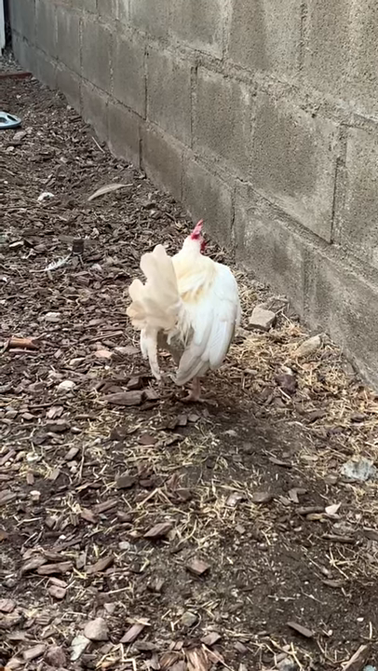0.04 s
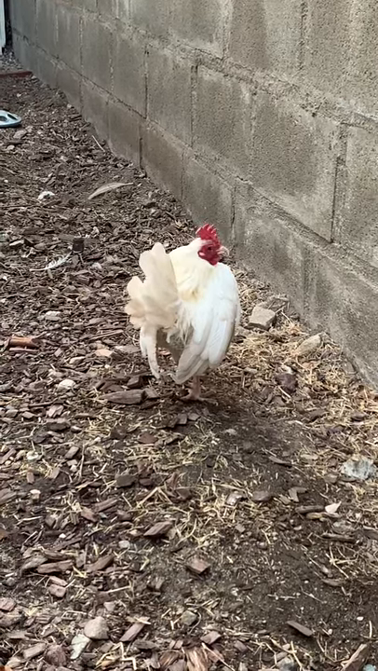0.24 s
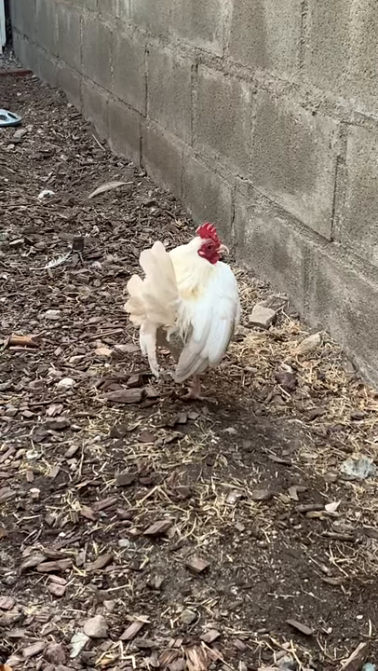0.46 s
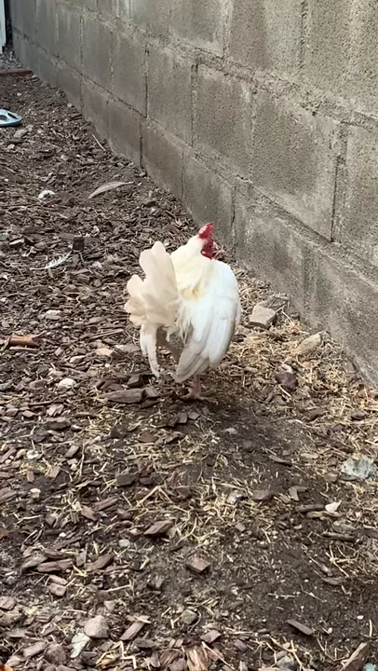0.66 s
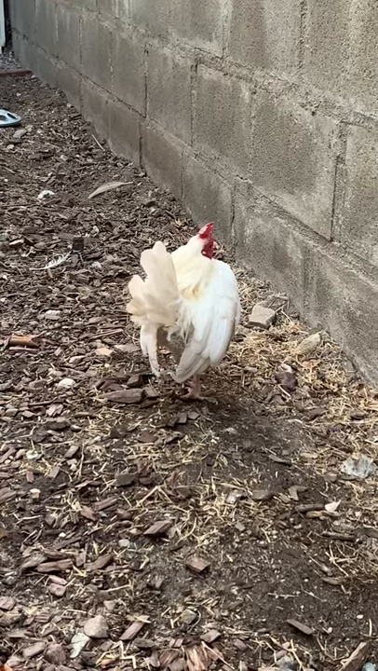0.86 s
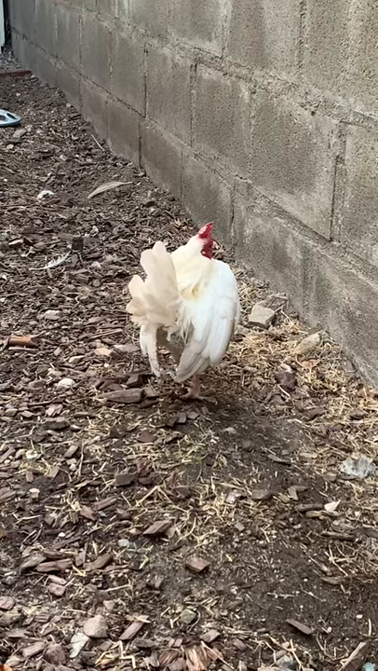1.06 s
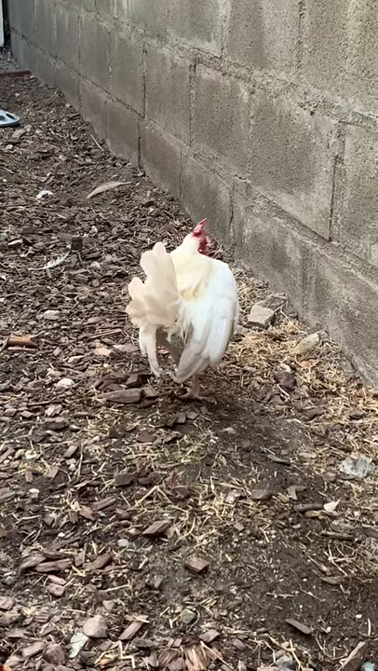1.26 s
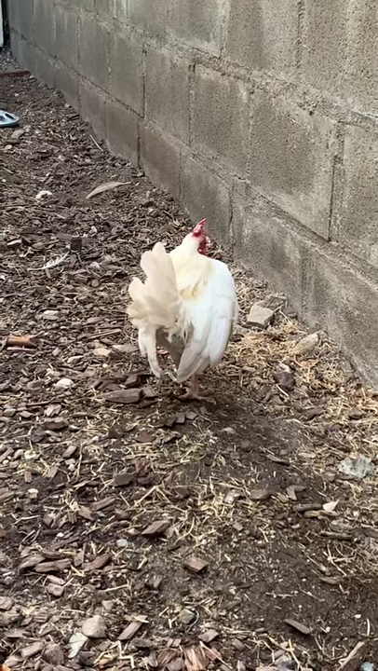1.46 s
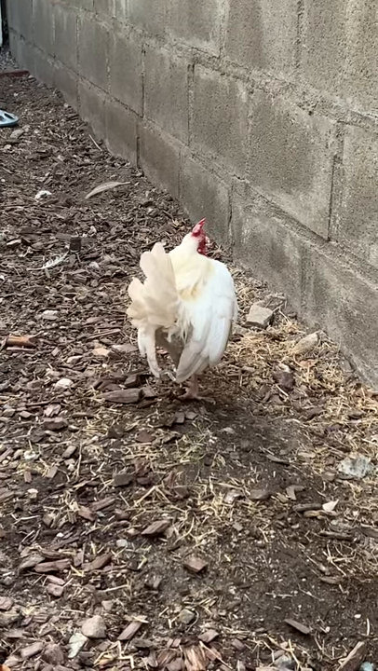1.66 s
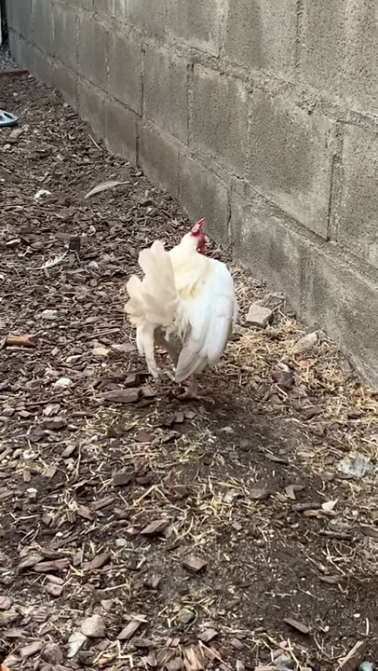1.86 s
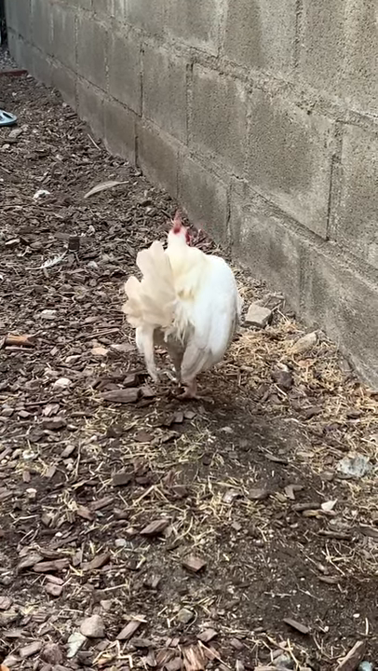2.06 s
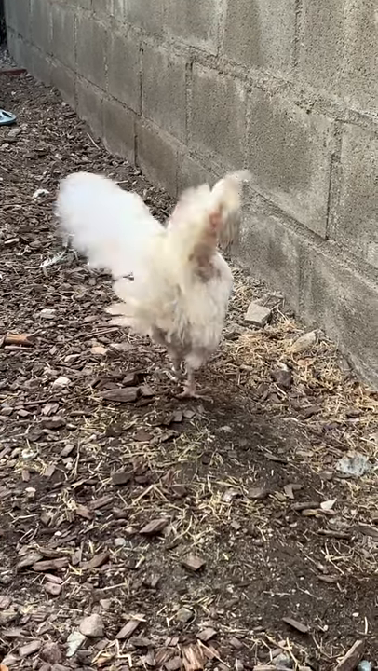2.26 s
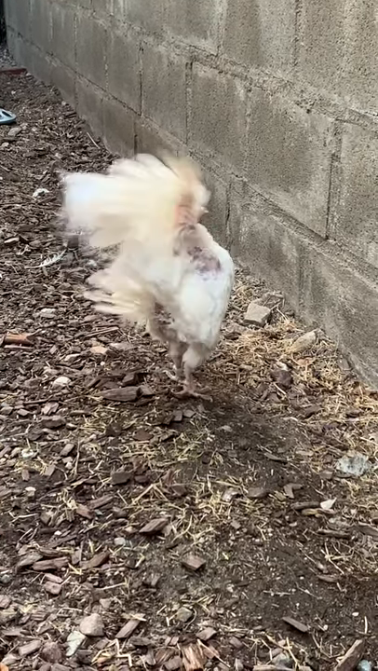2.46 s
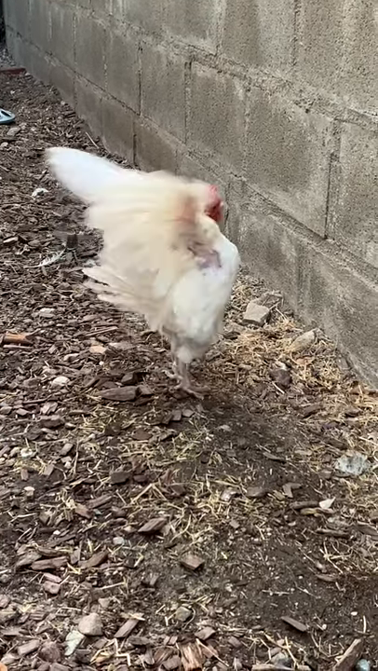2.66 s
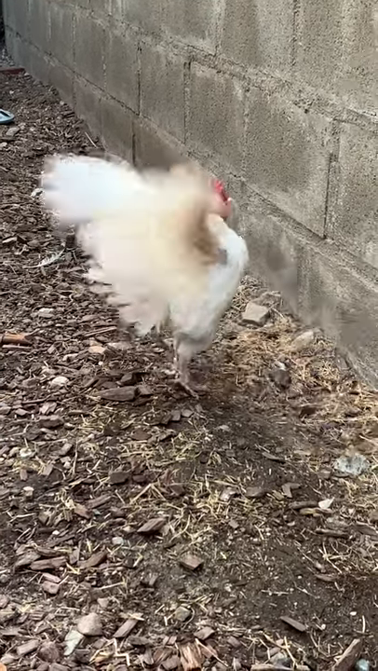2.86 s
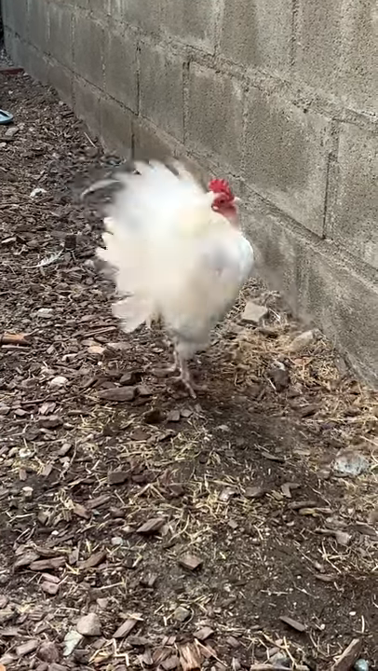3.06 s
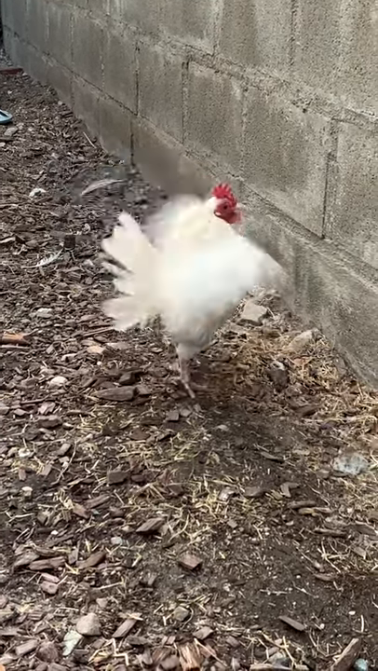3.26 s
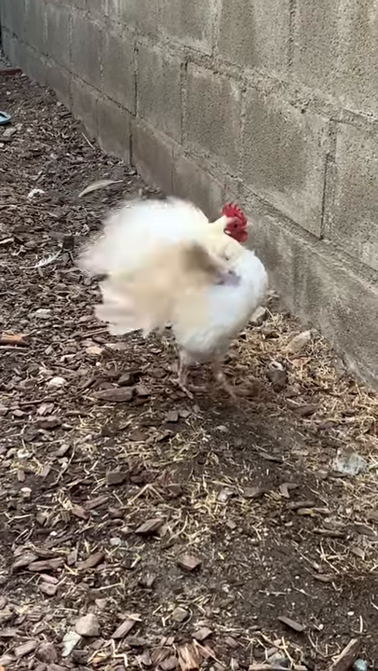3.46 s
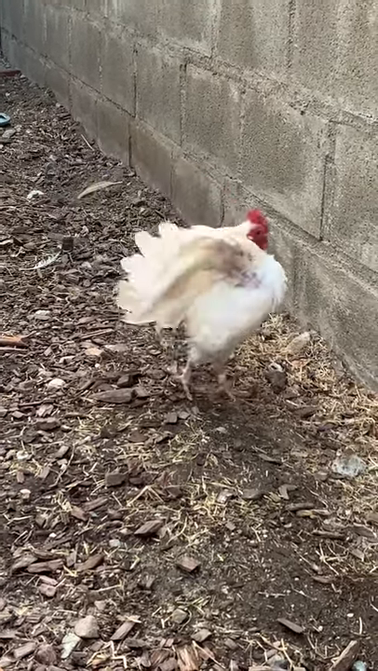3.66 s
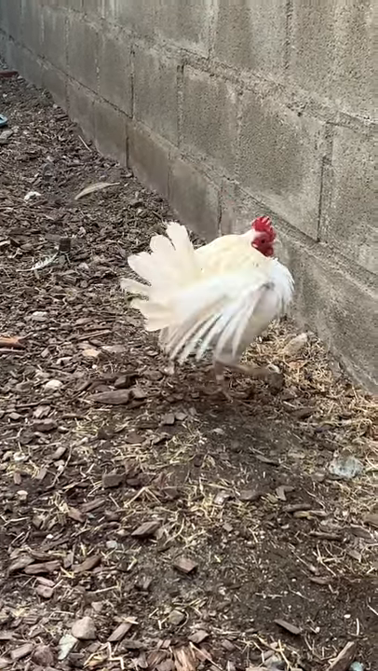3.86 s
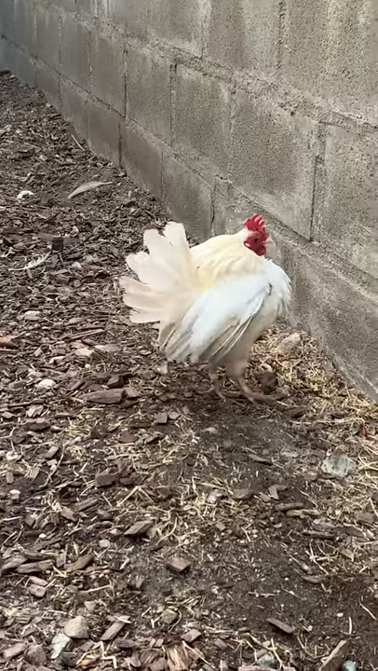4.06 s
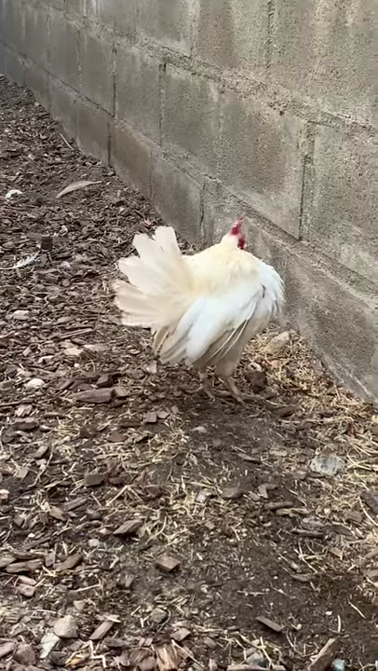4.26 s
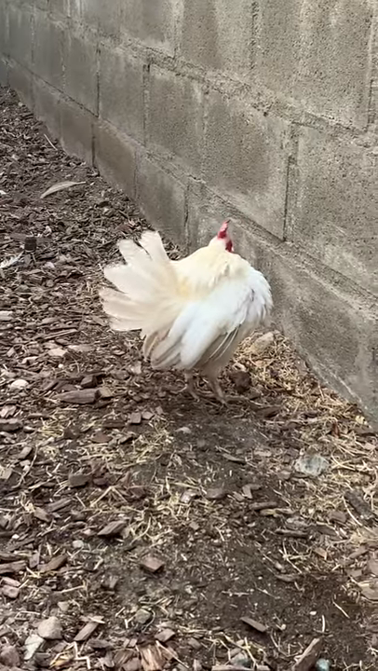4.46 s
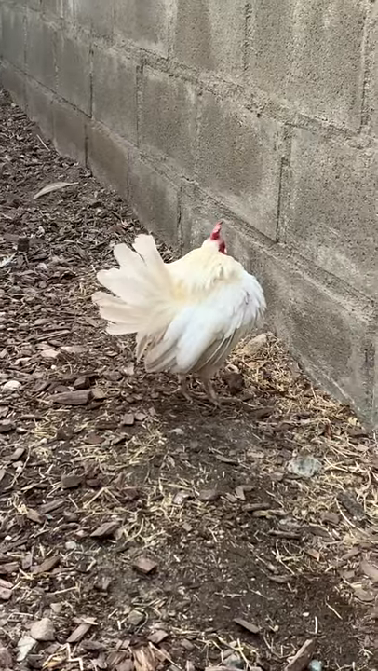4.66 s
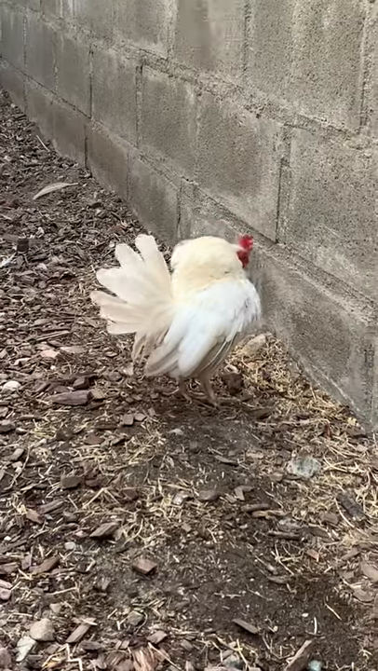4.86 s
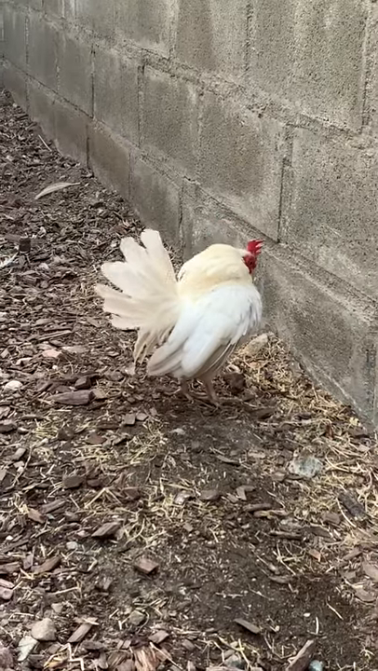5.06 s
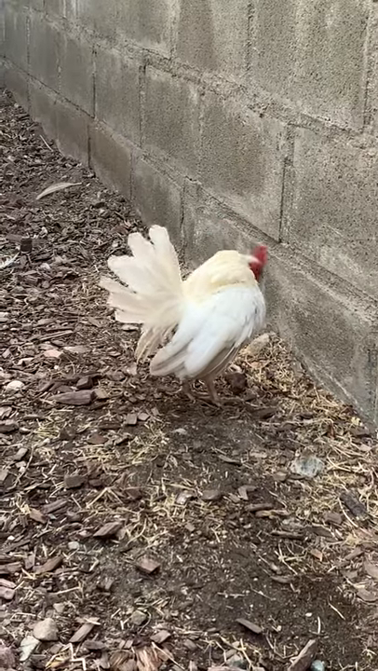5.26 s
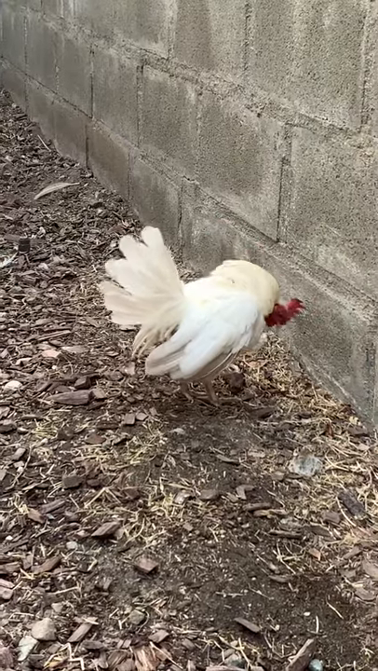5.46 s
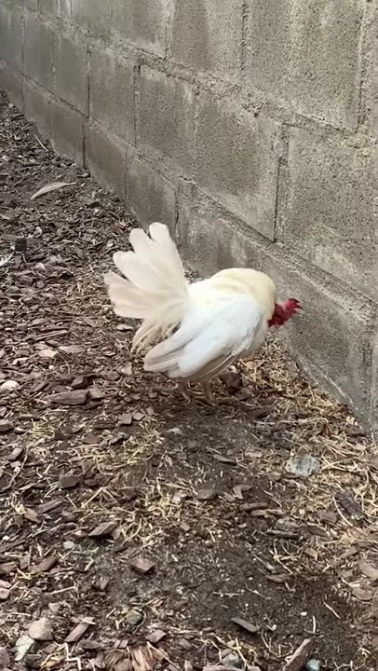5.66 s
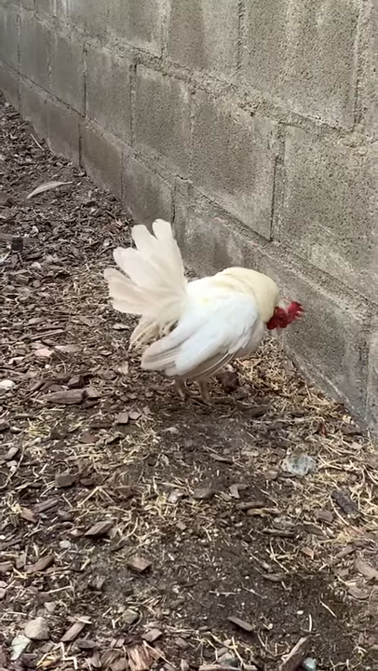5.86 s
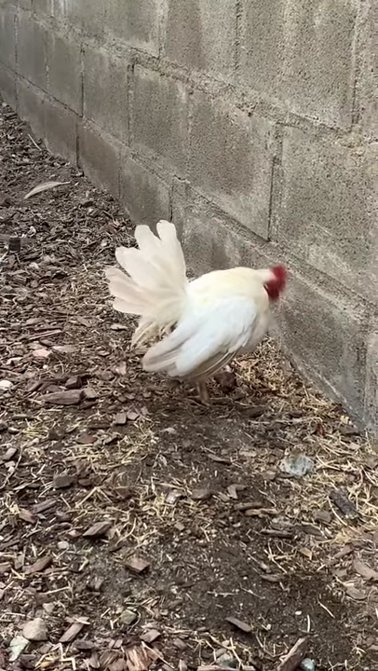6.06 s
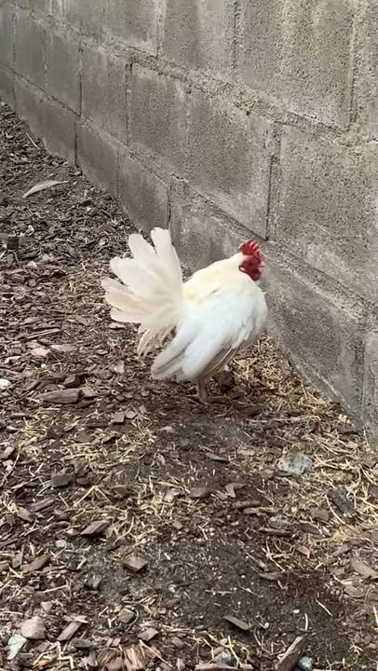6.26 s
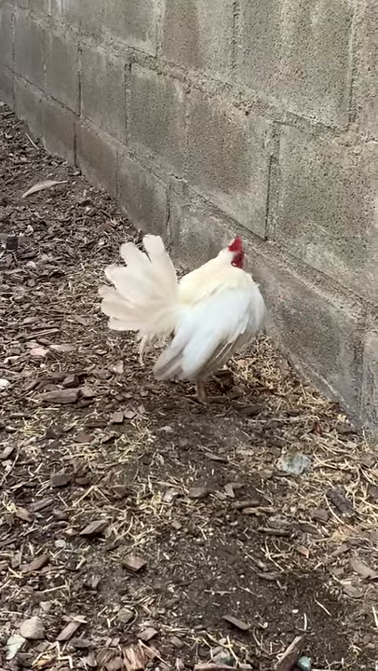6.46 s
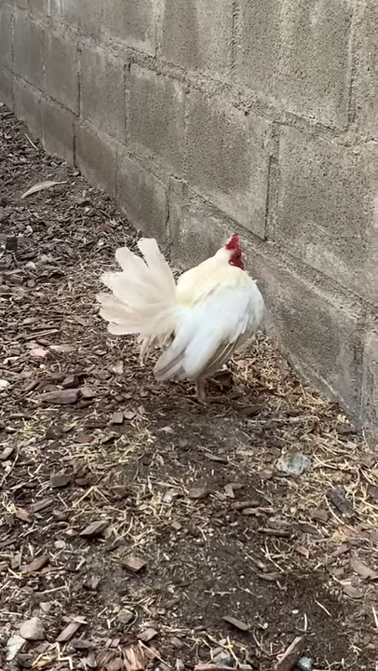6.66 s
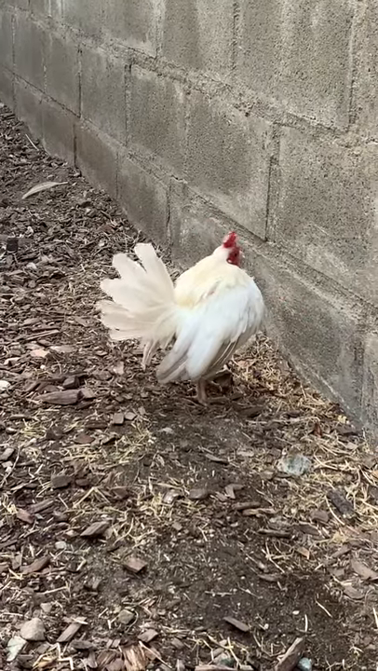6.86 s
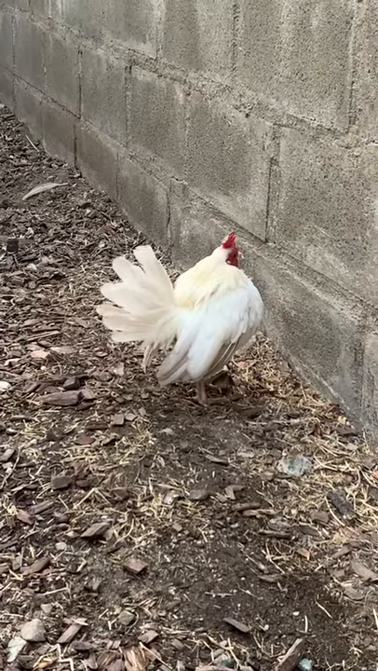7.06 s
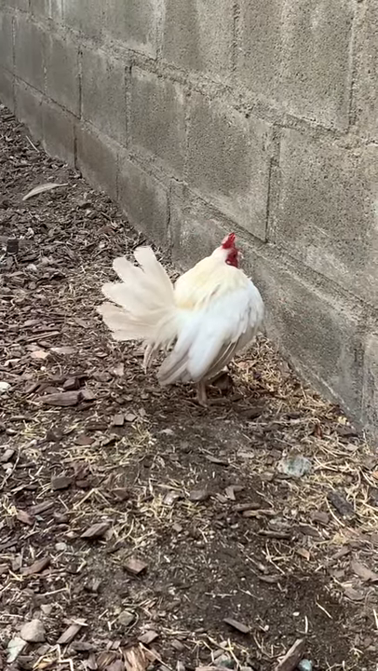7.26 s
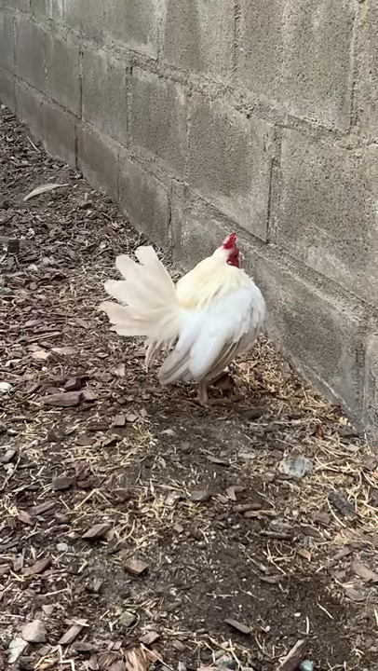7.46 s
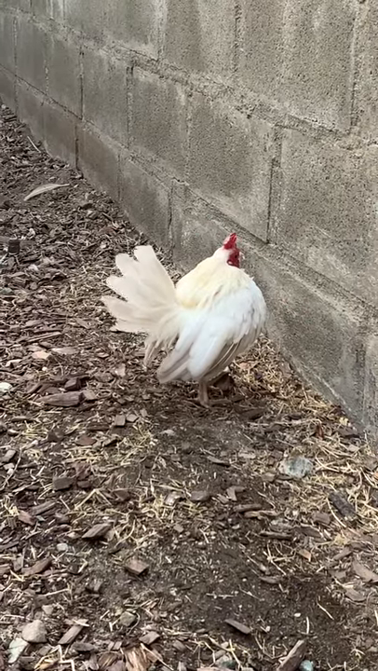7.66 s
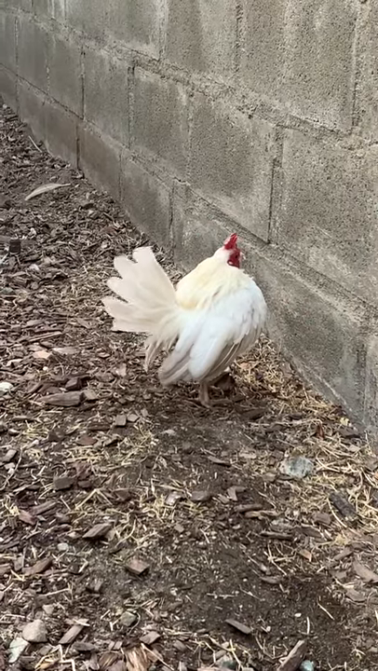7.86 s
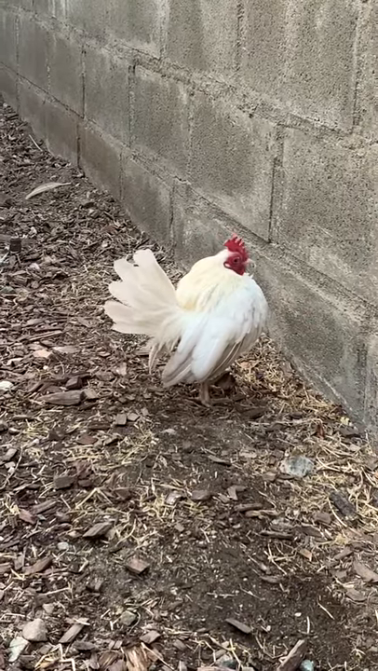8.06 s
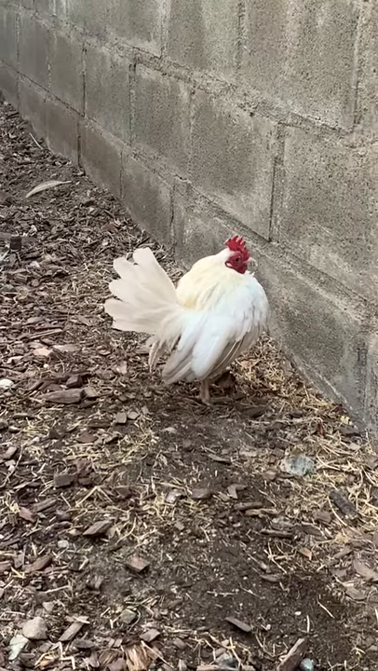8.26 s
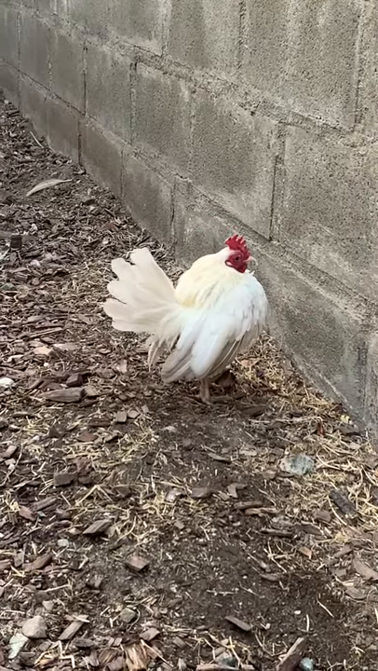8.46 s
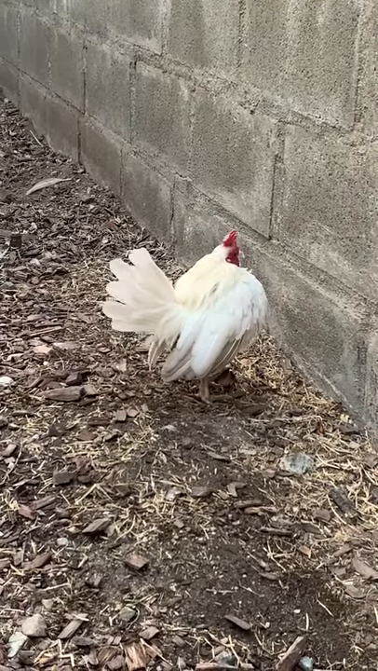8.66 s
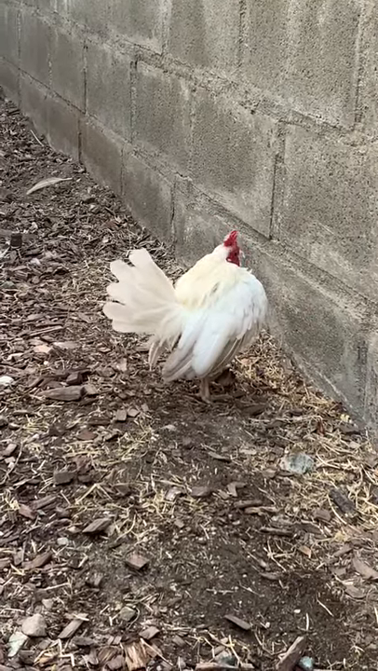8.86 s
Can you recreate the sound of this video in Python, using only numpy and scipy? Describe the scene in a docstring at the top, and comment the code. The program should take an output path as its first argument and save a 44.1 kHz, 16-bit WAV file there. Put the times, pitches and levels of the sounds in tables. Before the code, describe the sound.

A quiet outdoor yard beside a block wall, low town rumble and sparse sparrow chirps. About two and a half seconds in, a rooster beats its wings five times, sharp cracks and hollow slaps with feathery swishes, loudest at the fourth. Rustles settle, then three quick clucks and more chirps. Close stereo microphone, short dry reflections.

```python
"""Wing-clapping rooster in a walled yard

A bantam rooster by a block wall beats its wings: shaped noise swishes through the feathers, and each
clap is a bright crack plus a slap ringing the cupped air. Later it clucks three times, in beating sines.
Small birds chirp as gliding sines nearby and far off, over a town of filtered noise and engine tones;
two microphone ports hear the yard with a phase turn between them."""
import sys
import numpy as np
from scipy import signal
from scipy.fft import rfft, irfft, next_fast_len
from scipy.io import wavfile
from scipy.ndimage import uniform_filter1d, map_coordinates

SR = 44100
rng = np.random.default_rng(int(sys.argv[2]) if len(sys.argv) > 2 else 0)


def wav_record(signal):
    """Record a signal, one row per channel, as 16-bit PCM in the file named by sys.argv[1]."""
    frames = np.transpose(np.atleast_2d(signal))
    bounded = np.clip(frames, -1, 1)
    # unit amplitude maps onto the largest positive 16-bit level
    quanta = np.round(bounded * 32767).astype(np.int16)
    wavfile.write(sys.argv[1], SR, quanta)


N = 392931
TIME = np.arange(N) / SR


def amp(db):
    """Decibel law: 20 dB is a factor of ten in amplitude."""
    return 10 ** (np.asarray(db) / 20)


def unit(x):
    """Normalisation to an rms of 1."""
    return x / np.sqrt(np.mean(x ** 2) + 1e-20)


def along(points, hz):
    """Interpolation of (f/Hz, value) points on a logarithmic frequency axis; the ends hold."""
    f, v = np.transpose(points)
    return np.interp(np.log(hz + 1), np.log(f + 1), v)


def wobble(rate, count=N):
    """Band-limited random modulation: a smooth curve through `rate` random knots a second."""
    knots = rng.standard_normal(int(count * rate / SR) + 4)
    return map_coordinates(knots, [np.arange(count) * rate / SR])


def filtered(x, response):
    """Linear filtering: the spectrum of x times a complex frequency response."""
    m = next_fast_len(x.shape[-1] + 8192)
    return irfft(rfft(x, m) * response(np.fft.rfftfreq(m, 1 / SR)), m)[..., :x.shape[-1]]


def shade(spectrum):
    """Spectral shaping: a gain curve that closes within an octave beyond its ends."""
    closed = [(spectrum[0][0] / 2, -80), *spectrum, (spectrum[-1][0] * 2, -80)]
    return lambda hz: amp(along(closed, hz))


def resonances(modes):
    """Modal superposition: causal response of (f/Hz, width/Hz, level/dB) modes of alternating sign."""
    def response(f):
        return sum((-1) ** k * amp(db) * 1j * f * width / (centre ** 2 - f * f + 1j * f * width)
                   for k, (centre, width, db) in enumerate(modes))
    return response


def swells(s, db, rise, fall):
    """Power addition of overlapping swells, each rising and fading at a steady dB/s."""
    s, db, rise, fall = (np.reshape(v, (-1, 1)) for v in (s, db, rise, fall))
    t = TIME[::SR // 1000]  # a grid of about 1 ms is fine enough
    level_db = db - np.maximum(rise * (s - t), fall * (t - s))
    return np.interp(TIME, t, np.sqrt(np.sum(amp(2 * level_db), axis=0)))


def add(out, s, hz, db, depth, beat_hz, second_db, blur):
    """Frequency and amplitude modulation: a wavering sine and overtone, beating unevenly, added to out."""
    t = np.arange(s[0], s[-1], 1 / SR)
    wavering_hz = np.interp(t, s, hz) * (1 + blur * wobble(400, count=len(t)))
    phase = 2 * np.pi * np.cumsum(wavering_hz) / SR
    beat = np.cos(2 * np.pi * beat_hz * (t - s[0]) + 0.26 * wobble(79, count=len(t)))
    edges = np.clip(np.minimum(t - s[0], s[-1] - t) / .003, 0, 1)  # 3 ms ramps
    beating = 1 + np.clip(np.interp(t, s, depth), 0, 1) * beat
    level = np.sqrt(2) * edges * amp(np.interp(t, s, db)) * beating
    out[round(s[0] * SR):][:len(t)] += level * (np.sin(phase) + amp(second_db) * np.sin(2 * phase))


# likeness of a diffuse field at the two ports: f/Hz, correlation (0-1)
PORT_LIKENESS = [(60, 1), (170, 0.98), (280, 0.58), (450, 0.85), (1300, 0.21), (1800, 0.39), (3000, 0.86),
                 (4000, 0.72), (8500, 0.96), (15000, 1)]


def rush(spectrum, patchy_db, size=512):
    """Diffuse-field coherence: a pair of noises of rms 1, partly alike, with patches of random gain."""
    z = signal.stft(rng.standard_normal((2, N)), nperseg=size)[2]
    field = uniform_filter1d(rng.standard_normal(z.shape[1:]), size=3, axis=0)
    patches = unit(uniform_filter1d(field, size=9, axis=1))
    pair = signal.istft(z * amp(patchy_db * patches), nperseg=size)[1][:, :N]

    def mix(hz):
        half_angle = np.arccos(np.clip(along(PORT_LIKENESS, hz), 0, 1)) / 2
        return shade(spectrum)(hz) * [np.cos(half_angle), np.sin(half_angle)]

    common, opposed = filtered(pair, mix)
    return unit(np.array([common + opposed, common - opposed]))


# reverberation of the corner by the wall: f/Hz, t60/s before the ratio `rings`
YARD_DECAY = [(300, 0.061), (2500, 0.082), (10000, 0.034)]


def yard(x, wet_db, rings=1):
    """Reverberation: direct sound plus decaying noise for walls and ground, different at each port."""
    hz, t, z = signal.stft(rng.standard_normal((2, SR // 3)), SR, nperseg=256)
    decay = amp(-60 * t / (rings * along(YARD_DECAY, hz))[:, None])
    tail = signal.istft(z * decay, SR, nperseg=256)[1]
    delayed = np.pad(x, (200, 0))[None]
    echo = signal.fftconvolve(delayed, tail / np.linalg.norm(tail[0]), axes=1)[:, :N]
    return x + amp(wet_db) * echo


# level difference between the ports: f/Hz, left minus right/dB
PORT_LEAN = [(60, -1), (250, -2.3), (800, -.8), (15000, 0)]


def ports(pair, turn):
    """Interaural-style differences: half the phase turn and level lean to each port, in opposite senses."""
    side = np.array([[.5], [-.5]])

    def response(hz):
        phase = side * np.interp(hz, *np.transpose(turn))
        return np.exp(1j * phase) * amp(side * along(PORT_LEAN, hz))

    return filtered(pair, response)


# tones of a passing engine: f/Hz before the pitch ratio, relative level/dB
ENGINE_TONES = [(165, -3.5), (205, -4), (250, -5), (325, -5), (375, -10.5), (500, -14.5), (540, -10)]
# course of the passing engine: t/s, pitch ratio, level/dB before each tone's own
ENGINE_COURSE = [(0, 0.98, -62.5), (.2, 0.95, -60.5), (.45, 0.98, -61), (.8, .97, -63.5), (1.05, 1.05, -74)]


def engine():
    """Additive synthesis: a far engine's wavering tones share one course of pitch and level, then fade."""
    out, (s, ratio, db) = np.zeros(N), np.transpose(ENGINE_COURSE)
    for hz, tone_db in ENGINE_TONES:
        add(out, s, hz * ratio, db + tone_db, .4 + 0 * s, beat_hz=7.5, second_db=-30, blur=.06)
    return yard(out, wet_db=-4.5)


# spectrum of distant engines: f/Hz, relative level/dB
RUMBLE_SPECTRUM = [(24, -40.5), (33, -17), (43, 0.5), (70, 0), (110, -6), (170, -20.5), (300, -35)]
# course of the rumble: t/s, level/dB before its random swelling
RUMBLE_COURSE = [(0, -44.5), (.45, -44), (.9, -46), (2.6, -43.5), (4.9, -47), (5.8, -45), (7.3, -46),
                 (8.4, -47.5), (8.91, -42)]
# spectrum of the traffic wash: f/Hz, relative level/dB
WASH_SPECTRUM = [(120, -10), (220, 3.5), (400, -9.5), (850, -3.5), (1100, -8.5), (1600, -18), (2400, -27.5),
                 (3600, -30.5), (5500, -49.5)]
# many far birds blurred together: f/Hz, relative level/dB
CHATTER_SPECTRUM = [(1400, 2), (1900, 0.5), (2500, -0.5), (3300, -27.5)]
# swells of the chatter: t/s, level/dB before its random swelling
CHATTER_SWELLS = [(1.37, -87), (5.4, -75), (6.85, -75.5), (7.82, -66.5), (8.5, -70.5)]
WASH_DB, CHATTER_DB_PER_S = -62, 47.5  # mean wash level; rise and fall of a chatter swell


def town():
    """Subtractive synthesis: swelling rumble, traffic wash and bird chatter; an engine drones at the start."""
    rumble_db = np.interp(TIME, *np.transpose(RUMBLE_COURSE)) + 1.0 * wobble(6)
    rumble = amp(rumble_db) * rush(RUMBLE_SPECTRUM, patchy_db=0.58)
    wash = amp(WASH_DB + .6 * wobble(4.4)) * rush(WASH_SPECTRUM, patchy_db=3.8, size=2048)
    outbursts = swells(*np.transpose(CHATTER_SWELLS), CHATTER_DB_PER_S, CHATTER_DB_PER_S)
    chatter = outbursts * amp(1.7 * wobble(12)) * rush(CHATTER_SPECTRUM, patchy_db=3.5)
    return rumble + wash + chatter + engine()


# near sparrows: t/s, top f/Hz, rise to the top/Hz, hold at the top/s, fall after it/Hz, fall time/s,
# level/dB, overtone relative level/dB
SPARROW_NOTES = [(1.184, 3510, 700, 0.0074, 330, 0.034, -62.5, -34),
                 (1.307, 3980, 810, 0.0098, 710, 0.025, -61.5, -40),
                 (1.452, 3800, 910, 0.0073, 1310, 0.049, -58, -25),
                 (5.312, 2900, 1280, .006, 610, 0.04, -64, -30),
                 (5.521, 2970, 810, .014, 820, 0.03, -64.5, -26),
                 (6.666, 2780, 706, 0.0028, 617, 0.041, -57.5, -19.5),
                 (6.797, 3170, 570, .008, 733, 0.036, -55, -20),
                 (6.955, 3030, 403, 0.00774, 610, 0.05, -55.5, -29),
                 (8.343, 3350, 549, 0.019, 557, 0.021, -53, -20),
                 (8.487, 3730, 850, 0.0083, 982, 0.048, -54, -25)]
# chirps that drop, growing louder: t/s, start f/Hz, fall/Hz, steady end/s, level/dB
FALLING_CHIRPS = [(4.752, 3760, 653, .004, -77), (4.893, 3770, 990, .008, -73),
                  (5.04, 3373, 757, .018, -69.5), (5.257, 3054, 519.6, 0.019, -61.5),
                  (5.474, 3321, 737, 0.018, -60.5)]
# far birds, and last a small dull knock near 1 kHz: t/s, start f/Hz, fall/Hz (negative rises), level/dB
FAR_NOTES = [(0.011, 3220, 244, -83), (.258, 3220, 400, -80.5), (.275, 2540, 62, -78),
             (.364, 3230, 302, -79), (0.414, 1875, 2, -82), (.472, 3240, 500, -81), (.58, 3140, 302, -77.5),
             (.645, 2130, 150, -79), (0.899, 1851, 146, -77), (1.182, 2610, 50, -70.5),
             (1.323, 2420, -200, -70.5), (2.153, 3780, 244, -82), (3.245, 3120, 100, -65),
             (3.483, 2773, -60, -73), (4.26, 3470, 100, -80.5), (6.615, 3010, 48.5, -80),
             (7.455, 3140, 200, -80.5), (7.562, 1830, 20, -61), (7.62, 2080, 30, -59.5),
             (7.913, 3520, 57, -74), (7.945, 3470, 91, -73.5), (8.01, 3830, 63, -73),
             (8.031, 2744, 60, -65.5), (8.702, 1033, 59, -66.5)]
# one thin high voice: t/s, level/dB
TWITTER_NOTES = [(.29, -78), (.811, -78), (1.824, -74), (1.995, -73), (2.151, -77.5), (2.203, -72),
                 (2.25, -73), (7.489, -74.5), (7.686, -78), (7.85, -77), (7.945, -79), (7.995, -70.5),
                 (8.16, -78)]
TWITTER_HZ, TWITTER_FALL_HZ, FAR_S = 4290, 200, .042  # FAR_S: length of every far note
UP_S, SOFT_START_DB, FADE_DB = .019, -12, -9  # sparrow rise, level at its start, level after the fall
# a faint rough strand just below, thickening each sparrow note as close echoes do
STRAND_DB, STRAND_BELOW_HZ = -11, 330
DROP_S = 0.026  # glide of a falling chirp
FAR_RINGS = 1.7  # open gardens ring this many times longer than the corner by the wall


def birds():
    """Frequency glides: near sparrows reach a flat top and slide down; far notes are thin and wet with echo."""
    near, far, u = np.zeros(N), np.zeros(N), np.linspace(0, 1, num=9)
    for s, top_hz, rise, hold_s, fall, fall_s, db, second_db in SPARROW_NOTES:
        hz = top_hz - np.r_[rise * (1 - u) ** 1.3, fall * np.sin(1.4 * u) ** 1.5]
        times = s + np.r_[UP_S * u, UP_S + hold_s + fall_s * u]
        level_db = db + np.r_[SOFT_START_DB * (1 - u) ** 1.5, FADE_DB * u ** .7]
        add(near, times, hz, level_db, .7 + 0 * hz, beat_hz=68, second_db=second_db, blur=.014)
        add(near, times, hz - STRAND_BELOW_HZ, level_db + STRAND_DB, .8 + 0 * hz,
            beat_hz=130, second_db=second_db, blur=.05)
    for s, start_hz, fall, end_s, db in FALLING_CHIRPS:
        times = s + np.r_[DROP_S * u, DROP_S + end_s]
        hz = start_hz - fall * np.r_[np.sin(np.pi / 2 * u) ** 1.5, 1]
        level_db = db + np.r_[6 * u - 6, -5]
        add(near, times, hz, level_db, .3 + 0 * hz, beat_hz=75, second_db=-30, blur=.028)
    twitter = [(s, TWITTER_HZ, TWITTER_FALL_HZ, db) for s, db in TWITTER_NOTES]
    for s, start_hz, fall, db in [*FAR_NOTES, *twitter]:
        hz, level_db = start_hz - fall * u ** 1.3, db - 40 * (u - .45) ** 2
        add(far, s + FAR_S * u, hz, level_db, .5 + 0 * u, beat_hz=56.2, second_db=-30, blur=.022)
    return yard(near, wet_db=-7.5, rings=FAR_RINGS) + yard(far, wet_db=-3.0, rings=FAR_RINGS)


# clucks: t/s, length ratio, f/Hz before the pitch ratio, level/dB, creak (0-1), creak rate f/Hz,
# lower strand relative level/dB, breath relative level/dB
CLUCK_CALLS = [(5.42, 0.78, 579, -39, 0.84, 125, -13, -31),
               (5.512, 0.94, 662, -31.5, 0.17, 112, -11.5, -30.5),
               (5.668, 0.97, 669, -32.5, 0.09, 111, -10.5, -22)]
# course of a cluck through attack, hold, drop and tail: t/s before the length ratio, pitch ratio,
# relative level/dB, share of the creak
CLUCK_COURSE = [(0, 0.836, -8.5, 0.89), (.008, 0.98, -3.5, 0.62), (0.018, 1.025, -2, 0.97),
                (0.024, 1.0, -11, 0.78), (.05, .99, -18.5, .3), (0.058, 0.76, -24, 0.33)]
# spectrum of the breath: f/Hz, relative level/dB
BREATH_SPECTRUM = [(900, -11), (1300, -13), (2200, 8.5), (2900, -5), (3500, -1), (4500, 0), (5200, -26)]
BREATH_S = .026  # the breathy edge lasts through the hold


def rooster():
    """Amplitude beating: the first cluck creaks, the rest are nearly pure; all have a lower strand and breath."""
    out, air = np.zeros(N), np.zeros(N)
    after, ratio, shape_db, share = np.transpose(CLUCK_COURSE)
    for s, stretch, hz, db, creak, creak_hz, lower_db, breath_db in CLUCK_CALLS:
        times, pitch, level_db = s + stretch * after, hz * ratio, db + shape_db
        add(out, times, pitch, level_db, creak * share, beat_hz=creak_hz,
            second_db=-32.0 + 23.0 * creak, blur=0.071 * creak ** 2 + 0.0076)
        # the lower strand stops before the tail, and does not beat
        add(out, times[:4], pitch[:4] - creak_hz, level_db[:4] + lower_db, 0 * share[:4],
            beat_hz=creak_hz, second_db=-22, blur=0.01)
        air[round(s * SR):round((s + BREATH_S) * SR)] = amp(breath_db)
    breath = filtered(out * air * rng.standard_normal(N), shade(BREATH_SPECTRUM))
    return yard(out + breath, wet_db=-19)


# spectra of feather hiss, vane flutter and air push: f/Hz, relative level/dB
HISS_SPECTRUM = [(1500, -30.5), (3000, -15), (5500, 0), (8500, -2.5), (11000, -10.5), (13000, -10.5),
                 (15500, -11.5), (16000, -42)]
FLUTTER_SPECTRUM = [(250, -16.5), (600, -2.5), (1400, -4.5), (2500, -2), (4500, -10), (8000, -32.5)]
PUSH_SPECTRUM = [(60, -24), (130, -5), (240, -1.5), (380, -12.5), (800, -32.5)]
# wing beats: t/s of the clap, feather hiss level/dB, vane flutter level/dB, crack level/dB and slap level/dB
# before each contact's own, air push level/dB, cup pitch ratio, then the relative level/dB of each cup
# resonance above the lowest
WING_BEATS = [(2.485, -54.5, -54.5, -27, -19, -51, 1.03, -2, -2, -2.5, -5, 3),
              (2.651, -48, -44, -22.5, -2.5, -40.5, 1.01, 0, 3, 0.5, -1, -2),
              (2.8305, -43.5, -40.5, -15.5, -0.5, -44, 1.053, -1, 1, 1.5, 1.5, -2.5),
              (3.0040, -36.5, -41, -9, -2, -39.5, 1.045, 1, 2.5, -3, 0.5, 0.5),
              (3.195, -53, -49, -29.5, -8, -46, 0.95, -7, 3.5, -5, 1.5, 3)]
# soft rustles around the wing beats, and one faint high hiss much later: t/s, feather hiss level/dB,
# vane flutter level/dB, swell and fade rate/(dB/s) before each layer's pace
SOFT_RUSTLES = [(2.298, -67.5, -66.5, 359), (2.42, -72.5, -65.5, 397), (2.75, -90.5, -66, 36),
                (3.151, -66, -58, 324), (3.26, -86.5, -71, 305), (3.391, -67.5, -61.5, 133),
                (3.5, -84.5, -71, 154.5), (3.65, -86, -81, 49.5), (6.975, -75.5, -87.5, 250)]
RISE, FALL = 753.5, 400.5  # swish of a beat, dB/s before each layer's pace
PEAK_AFTER_S = 0.004  # swish peak after the clap
SECOND_S, SECOND_DB = 0.028, -9  # a second, softer surge after the clap, like an echo of the swish off a wall
SWING_S, SWING_DB = 0.027, -18.5  # the wings are heard swinging in before they meet
TICKS_PER_S, TICK_DB, TICK_SPREAD_DB = 400, 10, 3  # barbs unzipping in tiny clicks over the hiss


def strokes():
    """Flow noise: air through the feathers swells and dies with each stroke; rubbing barbs make it grainy."""
    s, hiss_db, flutter_db, _, _, push_db, *_ = np.transpose(WING_BEATS)
    soft_s, soft_hiss_db, soft_flutter_db, soft_rate = np.transpose(SOFT_RUSTLES)

    def level(db, soft_db, pace):
        rise, fall, soft = pace * RISE, pace * FALL, pace * soft_rate
        swing = swells(s - SWING_S, db + SWING_DB, rise, rise)
        meet = swells(s + PEAK_AFTER_S, db, rise, fall)
        second = swells(s + SECOND_S, db + SECOND_DB, fall, rise)
        return swing + meet + second + swells(soft_s, soft_db, soft, soft)

    def grain():
        return amp(3 * wobble(500) + 1.7 * wobble(110))

    tick_level = amp(TICK_DB + TICK_SPREAD_DB * rng.exponential(size=N))
    ticks = (rng.random(N) < TICKS_PER_S / SR) * tick_level
    barbs = grain() * rush(HISS_SPECTRUM, patchy_db=4.5) + filtered(ticks, shade(CRACK_SPECTRUM))
    vanes = grain() * rush(FLUTTER_SPECTRUM, patchy_db=4.0, size=256)
    push = rush(PUSH_SPECTRUM, patchy_db=3.0)
    return (level(hiss_db, soft_hiss_db, pace=.86) * barbs
            + level(flutter_db, soft_flutter_db, pace=0.99) * vanes
            + level(push_db, soft_flutter_db, pace=0.92) * push)


# spectrum of a crack, also of the barb ticks: f/Hz, relative level/dB
CRACK_SPECTRUM = [(1200, -22), (3500, -9.5), (5200, -7), (6800, -0.5), (8500, -1.5), (12500, -5),
                  (15500, -7), (16900, -32)]
# resonances of the air under cupped wings: f/Hz before the cup pitch ratio, width/Hz, relative level/dB
CUP_MODES = [(242.5, 18.6, -5.5), (960, 85, -3), (1386, 85, -5), (1853, 82, -5), (2630, 130, -14.5),
             (3690, 340, -11.5)]
# tips, two blades, trailing feathers: t/s after the clap, crack relative level/dB, slap relative level/dB
CLAP_CONTACTS = [(-.0036, -24, -15), (0, -1, 1), (.0011, -1, -8), (.0038, -14, -6)]
# small ticks with a short ring, some just before or after a clap: t/s, crack level/dB
SMALL_TICKS = [(2.051, -50.5), (2.461, -39.5), (2.719, -46), (2.811, -35), (2.8292, -19.5), (3.035, -27),
               (3.182, -40), (5.008, -68), (5.255, -61.5), (6.946, -47.5), (6.961, -55), (8.505, -58)]
TICK_RING_DB = 10.5  # ring under a small tick, over its crack
EDGE_S, RING_S, SLIDE_S = 0.003, 0.0031, 0.017  # t60 of the sharp edge, the slap and the feathers sliding apart
SLIDE_SHARE = .3  # feathers sliding apart, against the sharp edge
SMACK_DB, SPIKE_DB = 18, 14.5  # the single sharp push that starts a slap and a crack


def claps():
    """Impact and cavity resonance: a spiky crack, and a slap ringing the cupped air, a new cup each beat."""
    crack, slap, t = np.zeros(N), np.zeros(N), np.arange(SR // 10) / SR
    slide = SLIDE_SHARE * amp(-60 * t / SLIDE_S)
    crack_decay, slap_decay = amp(-60 * t / EDGE_S) + slide, amp(-60 * t / RING_S) + slide
    start = t == 0
    contacts = [(s + after, crack_db + a, slap_db + b, cup, [0, *tone_db])
                for s, _, _, crack_db, slap_db, _, cup, *tone_db in WING_BEATS
                for after, a, b in CLAP_CONTACTS]
    small = [(s, db, db + TICK_RING_DB, 1, [0] * len(CUP_MODES)) for s, db in SMALL_TICKS]
    for s, crack_db, slap_db, cup, tone_db in contacts + small:
        signs, noise, uneven_db = rng.standard_normal((3, len(t)))
        at = round(s * SR)
        spikes = amp(crack_db + 1.0 * uneven_db) * crack_decay * np.sign(signs)
        crack[at:][:len(t)] += spikes + amp(crack_db + SPIKE_DB) * start
        ring = resonances([(cup * hz, width, db + more)
                           for (hz, width, db), more in zip(CUP_MODES, tone_db)])
        blow = amp(slap_db) * slap_decay * noise + amp(slap_db + SMACK_DB) * start
        slap[at:][:len(t)] += filtered(blow, ring)
    return yard(filtered(crack, shade(CRACK_SPECTRUM)) + slap, wet_db=-13.5)


# phase by which the left port leads, for the rooster in front, the birds off to one side and
# the diffuse yard: f/Hz, phase/rad
ROOSTER_TURN = [(0, 0), (260, -.1), (500, -.9), (900, -2.2), (1150, -4), (1400, -4.4), (1850, -5.3),
                (2200, -3.7), (3900, -4.4), (5300, -3.14), (7800, -.2), (9200, .2), (11900, 3.14),
                (13300, 3.3), (15500, 6.28)]
BIRD_TURN = [(0, 2.3), (20000, 2.3)]
DIFFUSE_TURN = [(0, 0), (300, .2), (750, 2.9), (3700, 3.3), (4300, 2.4), (5200, 3.14), (7600, 6.2),
                (9500, 6.4), (11700, 9.35), (13300, 9.5), (15500, 12.56)]


def scene():
    """Superposition: town, birds and rooster add, each with its own phase turn at the ports."""
    near = strokes() + claps() + rooster()
    return ports(town(), DIFFUSE_TURN) + ports(birds(), BIRD_TURN) + ports(near, ROOSTER_TURN)


# spectrum of the microphone hiss: f/Hz, relative level/dB
MIC_HISS_SPECTRUM = [(2000, -13.5), (4000, 4.5), (5500, 0.5), (8500, 1.5), (12000, -0.5), (15200, -4),
                     (16000, -23.5)]
TOP_HZ = 17000  # nothing passes above this


def record(dry):
    """Additive self-noise and low-pass filtering: microphone hiss, then the band limit."""
    heard = dry + amp(-83) * ports(rush(MIC_HISS_SPECTRUM, patchy_db=3), DIFFUSE_TURN)
    return filtered(heard, lambda hz: np.clip((TOP_HZ - hz) / 400, 0, 1) ** 2)


dry = scene()
out = record(dry)
wav_record(out)
```